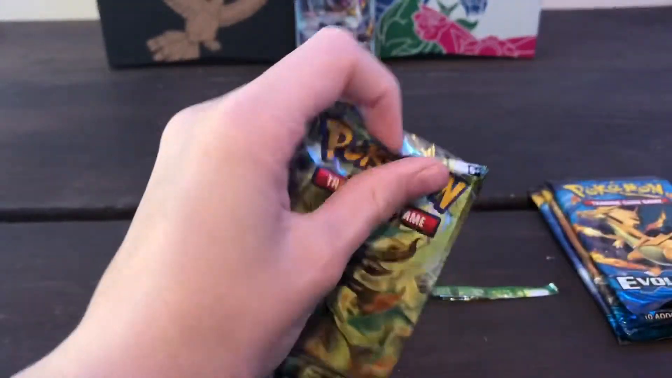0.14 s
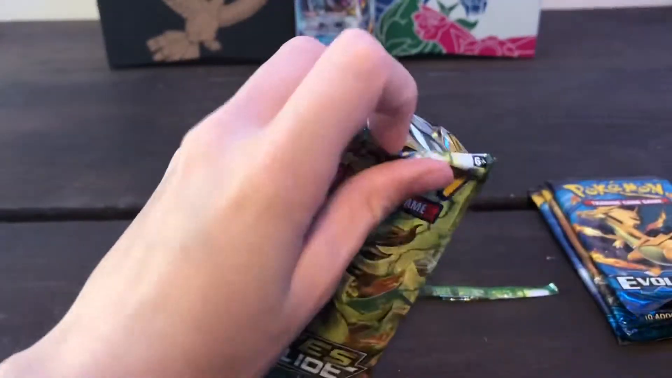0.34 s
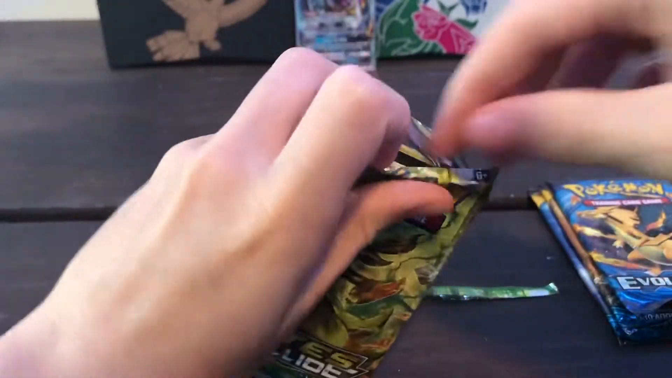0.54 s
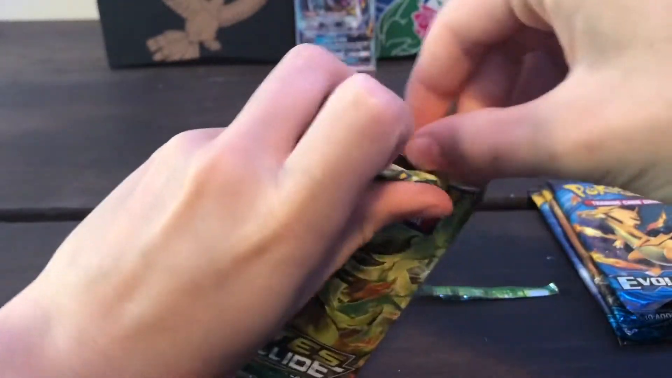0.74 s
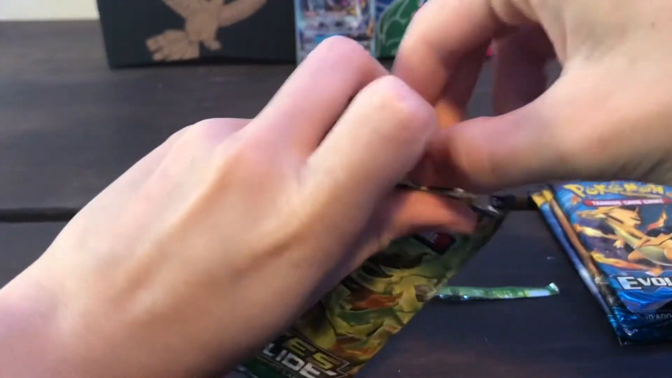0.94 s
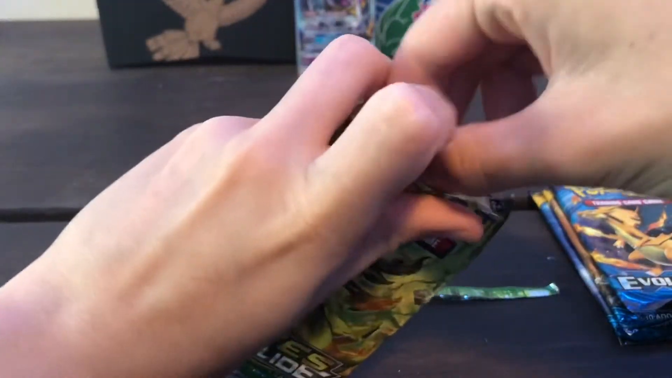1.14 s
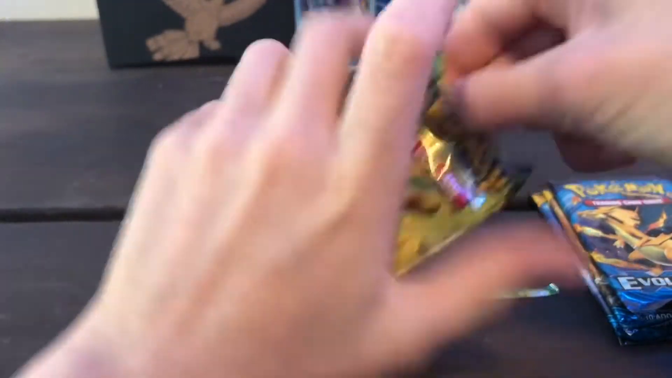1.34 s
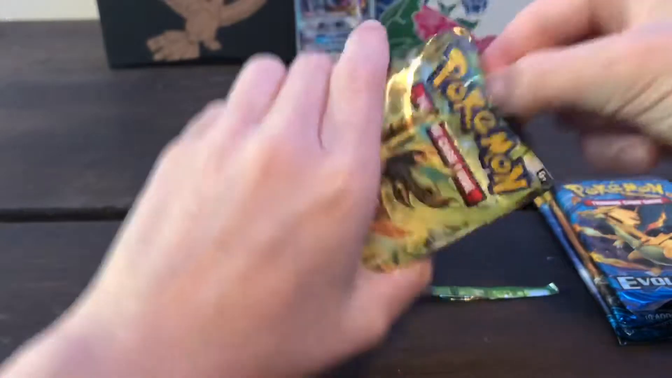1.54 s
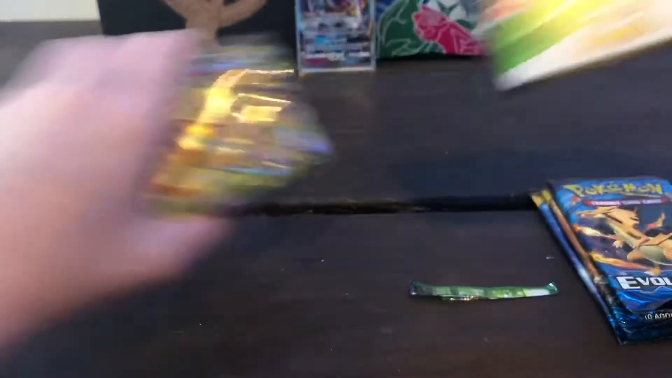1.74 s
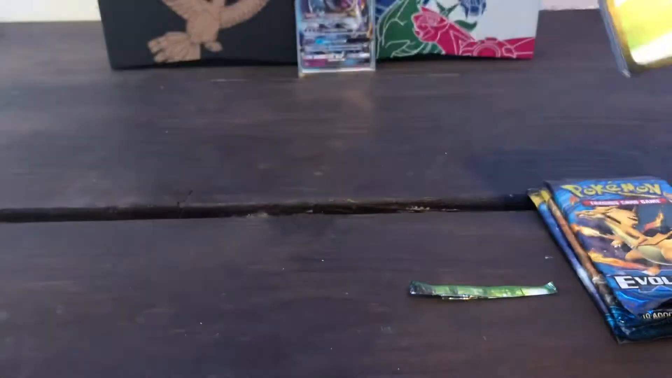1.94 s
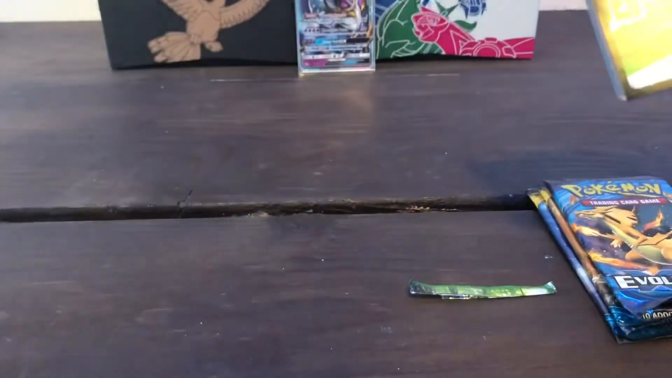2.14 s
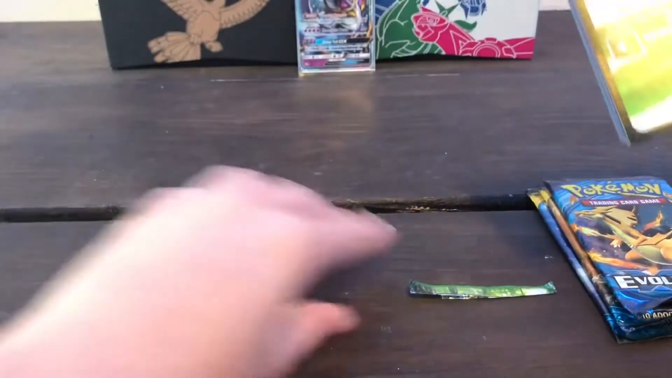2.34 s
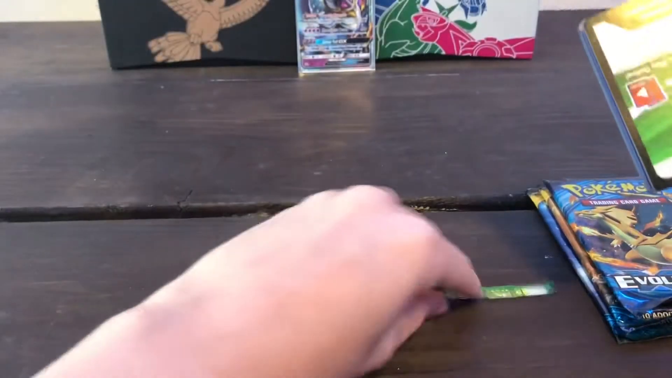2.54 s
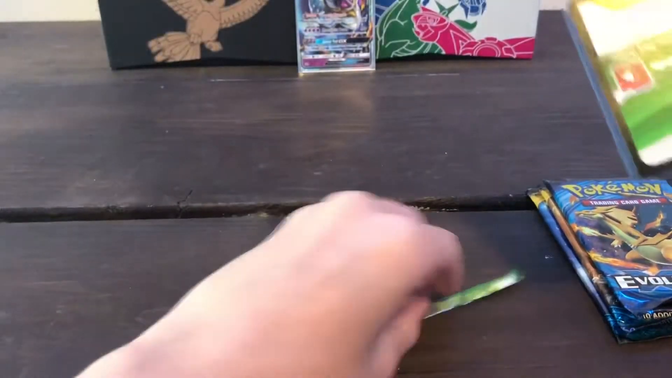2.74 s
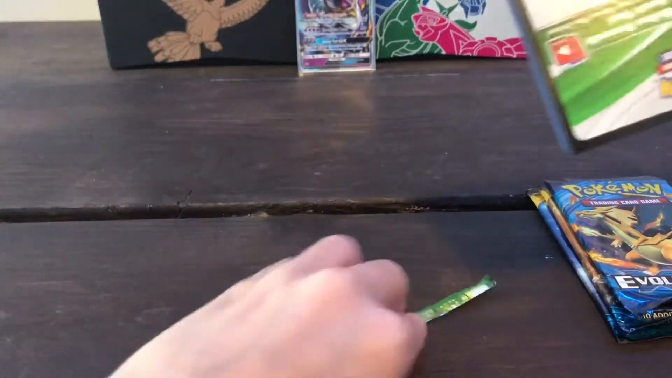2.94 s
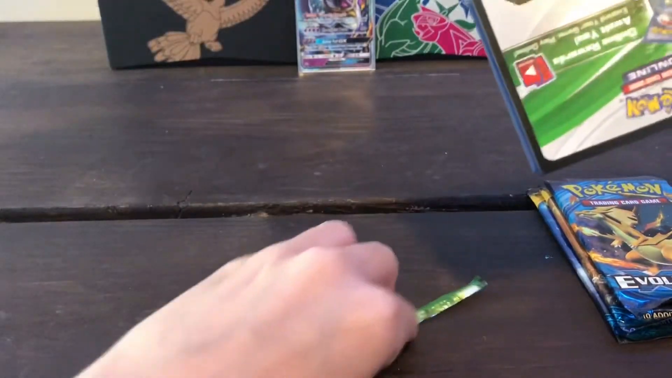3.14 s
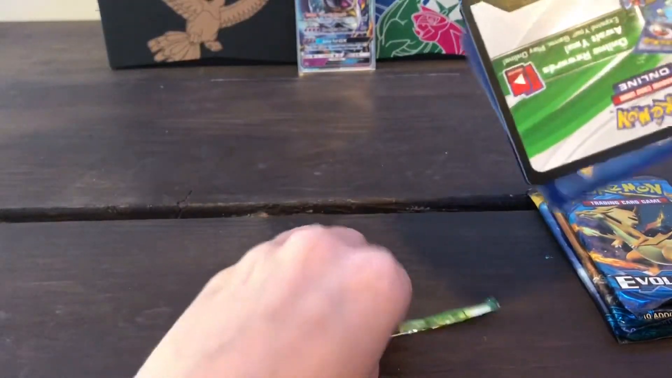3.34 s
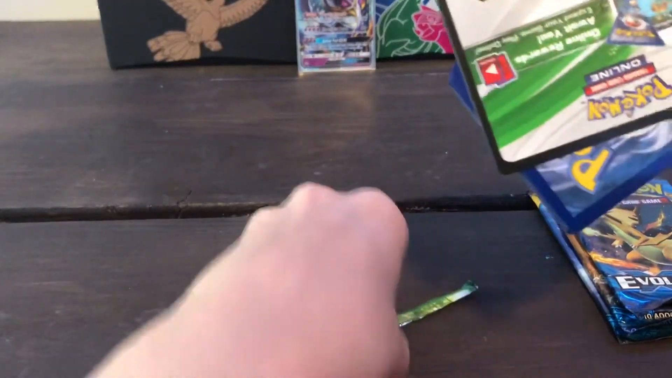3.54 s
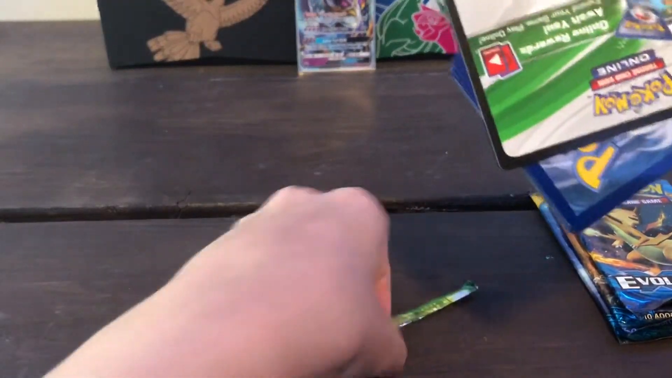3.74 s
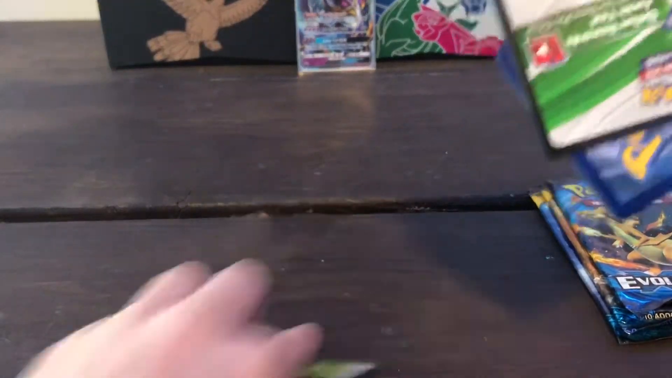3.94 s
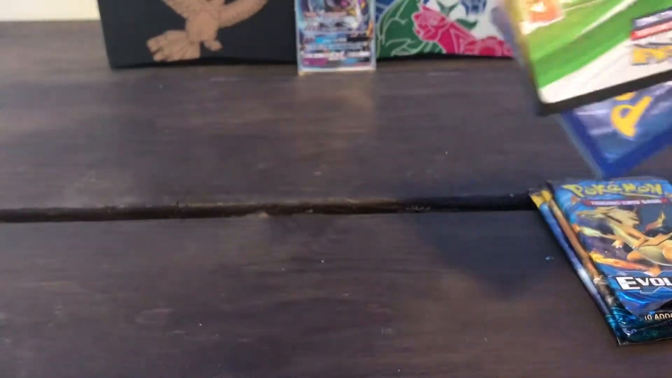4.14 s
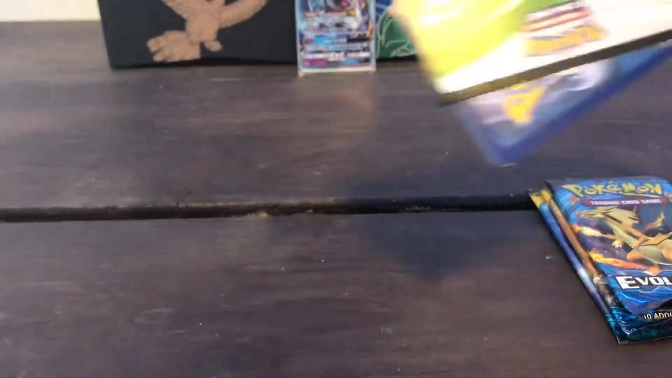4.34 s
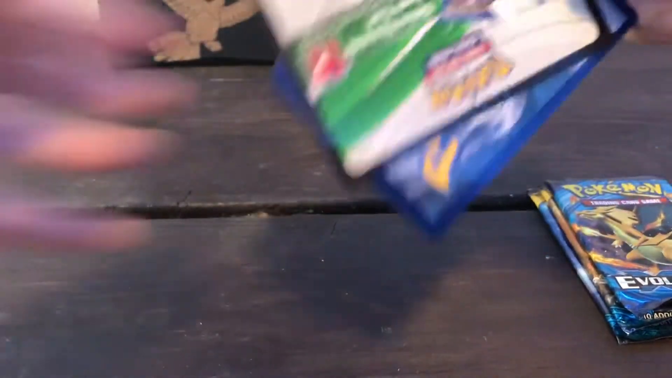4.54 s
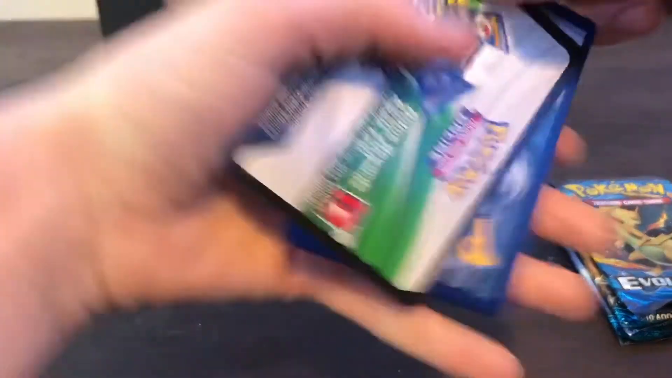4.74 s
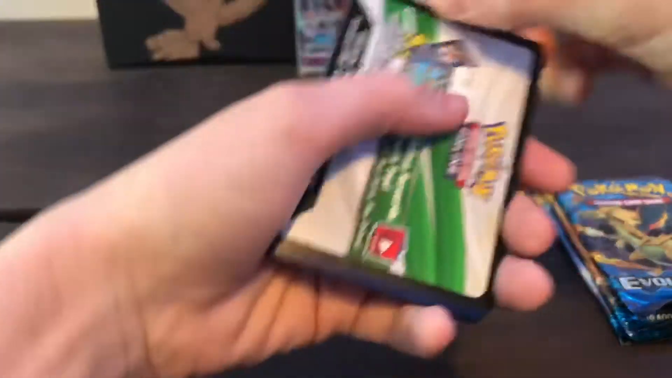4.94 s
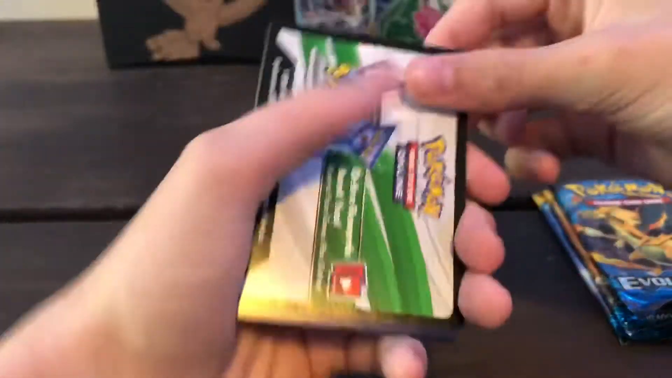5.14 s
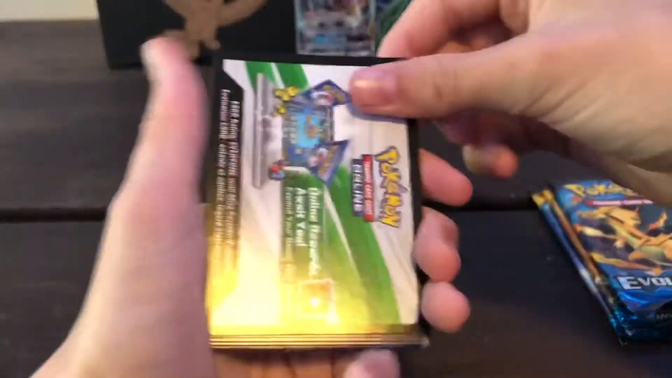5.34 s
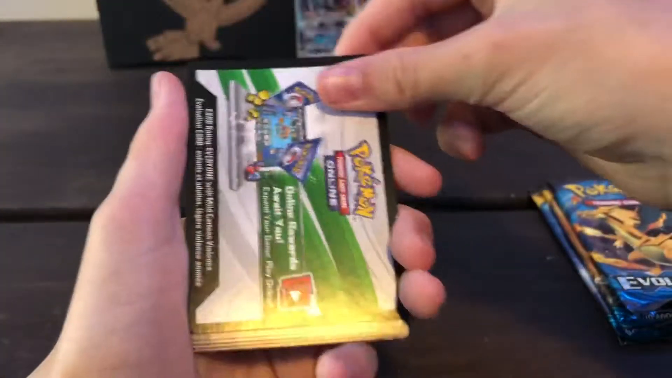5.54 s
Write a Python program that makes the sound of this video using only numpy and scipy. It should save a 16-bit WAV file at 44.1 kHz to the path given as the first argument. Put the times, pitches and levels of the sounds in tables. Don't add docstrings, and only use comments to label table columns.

```python
import sys
import numpy as np
from scipy import signal
from scipy.fft import rfft, irfft
from scipy.io import wavfile
from scipy.ndimage import uniform_filter1d

SR = 44100
rng = np.random.default_rng(int(sys.argv[2]) if len(sys.argv) > 2 else 0)


def level_to_linear(level):
    exponent = np.asarray(level, float) / 20
    return 10 ** exponent


def digitize_waveform(pressure):
    field = np.atleast_2d(pressure).T
    bounded = np.clip(field, -1, 1)
    quanta = np.round(bounded * 32767).astype(np.int16)
    wavfile.write(sys.argv[1], SR, quanta)


N = 246078


def evened(x):
    return x / np.sqrt(np.mean(x ** 2) + 1e-20)


def read(points, hz):
    point_hz, value = np.transpose(points)
    return np.interp(np.log(hz + 1), np.log(point_hz + 1), value)


def add(mix, s, sound):
    part = mix[max(round(s * SR), 0):][:len(sound)]
    part += sound[:len(part)]


def filtered(x, order, hz, kind):
    return signal.sosfilt(signal.butter(order, hz, kind, fs=SR, output="sos"), x)


def tipped_db(hz, dull_db, sharp_db):
    dull = 1 / (1 + (hz / 2900) ** 6)
    sharp = 1 / (1 + (9000 / (hz + 1)) ** 6)
    return np.outer(dull, dull_db) + np.outer(sharp, sharp_db)


def strokes(rows, rest_db):
    span_db, roundness = 20, 1.315
    t = np.arange(0, N / SR, .002)
    s, db, rise_s, fall_s, colour_db = np.transpose(rows)[:, :, None]
    away = np.maximum((s - t) / rise_s, (t - s) / fall_s)
    power = level_to_linear(2 * np.maximum(db - span_db * away ** roundness, -200))
    total = power.sum(0) + level_to_linear(2 * rest_db)
    return t, 10 * np.log10(total), (power * colour_db).sum(0) / total


def grit(per_s, spread_db, t60, smooth):
    size = level_to_linear(spread_db * np.minimum(rng.exponential(1, N), 1.8))
    slips = size * (rng.random(N) < per_s / SR)
    grip = signal.lfilter([1], [1, -level_to_linear(-60 / (t60 * SR))], slips)
    return evened((evened(grip) + smooth) * rng.standard_normal(N))


# (frequency [Hz], density [dB per Hz])
HUSH_SPECTRUM = [(18, -50), (30, -7.5), (48, 0), (399, -10.5), (1300, -19), (2600, -24.5), (15200, -32),
                 (16500, -39.5)]


def hush():
    level_db = -55
    hz, t, z = signal.stft(rng.standard_normal(N), SR, nperseg=1024)
    swell = evened(uniform_filter1d(uniform_filter1d(rng.standard_normal(z.shape), 6, 0), 7, 1))
    swell_db = 3 * swell / (1 + hz[:, None] / 900)
    z = z * level_to_linear(read(HUSH_SPECTRUM, hz)[:, None] + swell_db)
    return level_to_linear(level_db) * evened(signal.istft(z, SR, nperseg=1024)[1][:N])


# (frequency [Hz], T60 [s])
ROOM_DECAY = [(200, 0.2), (3000, 0.14), (15000, 0.032)]


def room(x):
    taps = np.zeros(SR // 2)
    at = np.arange(260, len(taps) - 20, 20)
    taps[at + rng.integers(0, 20, len(at))] = rng.choice([-1., 1.], len(at))
    hz, t, z = signal.stft(taps, SR, nperseg=256)
    z = z * level_to_linear(-60 * t / read(ROOM_DECAY, hz)[:, None])
    tail = signal.istft(z, SR, nperseg=256)[1]
    return signal.fftconvolve(x, tail / np.linalg.norm(tail))[:N]


# (time [s], peak [dB], frequency [Hz])
STAND_BUMPS = [(0.15, -42, 65), (0.501, -50, 95), (1.121, -48, 60.5), (1.39, -56, 60.5), (1.642, -41, 66),
               (1.749, -38, 64.6), (2.5, -42.5, 80), (2.821, -55, 55.4), (3.419, -61, 75.4),
               (3.529, -52, 64.8), (4.042, -47.5, 94.5), (4.103, -42.5, 98), (4.138, -45.5, 117),
               (4.2, -51.5, 106), (4.719, -47.5, 73), (4.95, -64, 90), (5.212, -54.5, 64),
               (5.541, -62.5, 70)]


def bumps():
    out, t = np.zeros(N), np.arange(SR // 5) / SR
    for s, db, hz in STAND_BUMPS:
        swing = np.minimum(t / 0.0039, 1) * np.sin(2 * np.pi * hz * t)
        add(out, s, level_to_linear(db + 11.5 - 60 * t * hz / 14.0) * swing)
    return out


def ring(force, modes):
    t = np.arange(SR // 2) / SR
    body = np.zeros(len(t))
    for k, (hz, db, t60) in enumerate(modes):
        body += (-1) ** k * level_to_linear(db - 60 * t / t60) * np.sin(2 * np.pi * hz * t)
    return signal.oaconvolve(force, body / np.linalg.norm(body))[:N]


# (peak time [s], level [dB], rise [s], fall [s], hardness on the upper modes [dB])
DRAGS = [(.05, -29, 0.23, 0.049, 5), (.14, -23.5, 0.013, 0.13, 7.5), (.2, -28, 0.089, 0.17, 9),
         (.27, -35, .11, 0.08, -10), (.52, -45, 0.18, 0.95, -18), (.8, -48, 0.047, 0.89, 20),
         (1.16, -47, 0.11, 0.13, 23), (1.5, -37.5, 0.059, 0.5, -11), (1.63, -40, 0.094, 0.32, -1),
         (1.85, -42.5, 1, 0.097, 2), (2.079, -40, 0.065, 0.13, 9.5), (2.33, -43.5, 0.037, 0.52, 3),
         (2.52, -40.5, 0.098, 0.059, 0), (2.8, -44.5, 0.16, 0.16, 6.5), (3.06, -35.5, 0.062, 0.082, -2),
         (3.25, -38, 0.058, 0.035, -3), (3.44, -44, 0.046, 0.35, 2.5), (3.57, -57, 0.19, 0.21, 4),
         (3.81, -42.5, 0.12, 0.15, 6), (3.92, -49, 0.31, 0.19, -13), (4.099, -46.5, 0.11, 0.089, 2),
         (5.0, -59, 0.76, 0.3, -6), (5.57, -54, 0.12, .11, 7)]
# (time [s], peak [dB], hardness on the upper modes [dB], ring of the struck spot [Hz])
BOARD_KNOCKS = [(0.004, -36, 7, 1160), (0.127, -20, 1.5, 1344), (0.194, -25, 4, 750),
                (1.613, -13.5, -14, 1185), (2.005, -29.5, 6.5, 1010), (2.047, -21.5, 1, 1130),
                (2.067, -28, 3, 1135), (2.304, -23, -12, 975), (2.895, -27.5, -15, 1020),
                (3.021, -64, -2.5, 1010), (3.409, -31, -30, 506), (3.469, -27, -13, 984),
                (3.51, -29.5, -8.5, 978), (3.532, -19, -15, 1010), (4.036, -29.5, -25, 1710),
                (4.093, -23, -23, 2050), (4.705, -28, -15.5, 476), (4.866, -38, -19, 600),
                (5, -42, -33.5, 697), (5.256, -44, -27.5, 588)]
# (frequency [Hz], level [dB], T60 [s])
LOW_BOARD_MODES = [(97.9, -1.5, 0.33), (137.4, 5.5, 0.14), (240, 7, 0.11), (269.4, 6, 0.075),
                   (460, 8, 0.022), (537, -8.5, 0.27)]
UPPER_BOARD_MODES = [(620, 1.4, 0.07), (705, 1.8, 0.086), (790, 4.4, 0.097), (967, 11.4, 0.057),
                     (1100, 2.3, 0.049), (1276, 4.6, 0.056), (1501, 5.4, 0.031), (1754, 6.15, 0.023),
                     (2013, 3.6, 0.013)]


def table():
    s, level_db, hard_db = strokes(DRAGS, rest_db=-77.0)
    t = np.arange(N) / SR
    low = level_to_linear(np.interp(t, s, level_db) + 1.5) * grit(per_s=28, spread_db=3.0, t60=0.09, smooth=1.1)
    low = 1.08 * filtered(low, 1, 260, "high")
    upper = level_to_linear(np.interp(t, s, level_db + hard_db) - 8.0)
    upper *= grit(per_s=85, spread_db=6.5, t60=0.014, smooth=2.7)

    spots, spot_db, spot_t60 = np.zeros(N), -1, .08
    blows = rng.standard_normal((len(BOARD_KNOCKS), 2, 900)) * level_to_linear(-60 * np.arange(900) / SR / 0.035)
    blows[:, :, 0] = 9
    t = t[:6000]
    for (s, db, hard_db, hz), (a, b) in zip(BOARD_KNOCKS, blows):
        add(low, s, level_to_linear(db + 17.5) * a / np.linalg.norm(a))
        add(upper, s, level_to_linear(db + hard_db + 24.5) * b / np.linalg.norm(b))
        add(spots, s, level_to_linear(db + hard_db + spot_db - 60 * t / spot_t60) * np.sin(2 * np.pi * hz * t))

    soft = filtered(low, 2, [95, 900], "band")
    dead = filtered(soft, 2, [170, 450], "band")
    upper = uniform_filter1d(upper, 5)
    return ring(soft, LOW_BOARD_MODES) + 3.4 * dead + ring(upper, UPPER_BOARD_MODES) + spots


LANDING_TIMES = [
    0.0034,
    .127,
    .203,
]
# (frequency [Hz], T60 [s], level at first, second, third spot [dB])
LONG_BOARD_MODES = [(101.7, 0.46, -25.5, -36, -26.5), (135.6, 0.48, -20.5, -27.5, -20.5),
                    (225, .12, -29, -13.5, -27), (280, 0.15, -33.5, -23, -27),
                    (430, 0.14, -41, -23.5, -15.5), (465, 0.15, -40, -31, -42.5),
                    (567, 0.48, -33, -25.5, -31), (600, 0.24, -26.5, -31, -31),
                    (732, 0.077, -40.5, -14, -32), (783, 0.13, -62.5, -25.5, -26),
                    (1010, 0.2, -25.5, -34, -33.5), (1080, 0.14, -16.5, -54.5, -31),
                    (1450, 0.066, -28.5, -22, -29), (1710, 0.079, -32, -20, -28.5)]


def landings():
    out, t = np.zeros(N), np.arange(SR // 2) / SR
    onset = 1 - np.exp(-t / 0.0025)
    for k, s in enumerate(LANDING_TIMES):
        for j, (hz, t60, *spot_db) in enumerate(LONG_BOARD_MODES):
            tone = onset * np.sin(2 * np.pi * hz * t)
            add(out, s, (-1) ** j * level_to_linear(spot_db[k] - 60 * t / t60) * tone)
    return out


def gripped(rows, dull_db, dull_per_db, rest_db):
    t, level_db, sharp_db = strokes(rows, rest_db)
    dull = dull_db + dull_per_db * (np.maximum(level_db, -70) + 45)
    return np.transpose([t, level_db, dull, sharp_db])


def hiss(rows, surface, change_s, force, trim_db, patchy_db):
    hz, t, z = signal.stft(force, SR, nperseg=256, noverlap=192)
    s, level_db, dull_db, sharp_db = np.transpose(rows)
    patches = evened(uniform_filter1d(uniform_filter1d(rng.standard_normal(z.shape), 9, 0), 9, 1))
    field_db = tipped_db(hz, np.interp(t, s, dull_db), np.interp(t, s, sharp_db)) + patchy_db * patches
    f, *faces_db = np.transpose(surface)
    before_db, after_db = [np.interp(np.log(hz + 1), np.log(f), db)[:, None] for db in faces_db]
    field_db += np.where(t < change_s, before_db, after_db)
    out = signal.istft(z * level_to_linear(field_db), SR, nperseg=256, noverlap=192)[1][:N]
    return out * level_to_linear(np.interp(np.arange(N) / SR, s, level_db, -120, -120) + trim_db)


# (peak time [s], level [dB], rise [s], fall [s], sharp part [dB])
CARD_STROKES = [(2.31, -48, .012, 0.17, -14), (2.45, -62, 0.62, 0.25, -5), (2.52, -41.5, 0.04, 0.041, -1),
                (2.6, -60.5, 0.15, 0.37, 8), (2.685, -35, 0.035, 0.03, 4.5), (2.765, -38, 0.037, 0.088, 7),
                (2.85, -47, 0.21, 0.16, 10), (3.06, -46.5, 0.057, 0.034, -17),
                (3.095, -40.5, 0.036, 0.039, -4), (3.13, -56.5, .012, 0.076, 7),
                (3.212, -43.5, 0.019, 0.066, 11), (3.248, -45.5, .03, 0.021, -4),
                (3.36, -53.5, 0.17, 0.13, 4), (3.474, -46, 0.01, 0.021, 3),
                (3.53, -46.5, 0.035, 0.056, -10.5), (3.724, -51.5, 0.0076, .1, 6.5),
                (3.76, -42, 0.029, 0.037, 6.5), (3.79, -37, 0.031, 0.028, 9), (3.83, -40, 0.0753, 0.1, 8.5),
                (3.925, -31, 0.038, 0.11, 9), (3.968, -23, 0.089, 0.096, 14), (4.035, -29, .07, 0.11, 16.5),
                (4.105, -34, 0.055, 0.063, -2.5), (4.16, -52, .05, 0.14, -6.5),
                (4.638, -50.5, 0.0047, 0.066, -9.5), (4.66, -40.5, 0.015, 0.03, -12),
                (4.697, -56, .005, 0.033, -9.5), (4.707, -34, 0.0062, 0.055, -21),
                (4.74, -30.5, 0.037, 0.04, -0.5), (4.766, -40, 0.027, 0.01, 2),
                (5.03, -61.5, 0.1, 0.021, -8), (5.32, -62, 0.021, 0.022, -1.5),
                (5.546, -47.5, 0.016, 0.19, -3)]
# (frequency [Hz], fanning the cards [dB], squaring the stack [dB])
CARD_COLOUR = [(498, -18.5, -27), (1100, 1, -7.5), (1750, 1.5, -8), (2700, 0, -0.5), (3700, 0.5, 0),
               (5400, 2.5, -0.5), (11340, -6, 1.5), (14920, -2.5, 6)]
STACK_BANDS_HZ = [2650, 5500]


def card_slides():
    squared_s, ring_db = 4.5, 4
    grip = gripped(CARD_STROKES, dull_db=1.1, dull_per_db=-0.23, rest_db=-78.5)
    force = grit(per_s=320, spread_db=9.5, t60=0.0044, smooth=3.0)
    cards = hiss(grip, CARD_COLOUR, squared_s, force, trim_db=3.5, patchy_db=1.5)
    rings = sum(signal.lfilter(*signal.iirpeak(hz, 7, fs=SR), cards) for hz in STACK_BANDS_HZ)
    return cards + level_to_linear(ring_db) * rings * (np.arange(N) > squared_s * SR)


# (peak time [s], level [dB], rise [s], fall [s], sharp part [dB])
FOIL_SQUEEZES = [(0, -24.5, .05, 0.057, -13), (.13, -27.5, 0.14, 0.14, -2), (.21, -38, 0.1, 0.042, 18),
                 (.365, -66, .011, .08, -11.5), (.456, -46, 0.009, 0.19, 14), (.655, -42, 0.31, 0.38, -6),
                 (.8, -37, 0.25, 0.25, -11.5), (.91, -42, .11, 0.37, -9), (1.048, -32, 0.022, 0.3, -3.5),
                 (1.152, -24, .022, 0.04, -9), (1.176, -22.5, .06, 0.038, -6.5),
                 (1.235, -36, .07, 0.063, 7.5), (1.35, -35, 0.045, 0.16, -6),
                 (1.52, -25.5, .11, 0.025, -1.5), (1.6, -25.5, .15, 0.092, 4),
                 (1.645, -29, 0.17, 0.0079, 0.5), (1.74, -41.5, .25, 0.23, -7),
                 (1.93, -39, 0.11, 0.11, -14), (2.025, -35.5, 0.027, 0.12, -13)]
# (frequency [Hz], sliding on the wood [dB], crinkling [dB])
FOIL_COLOUR = [(251, -9.5, -6.5), (780, 0, -2), (2780, -2, -0.5), (3930, -10, -4.5), (4100, 3.5, -1.5),
               (14990, -6.5, -4)]
GRAIN_EDGES_HZ = [200, 1800, 4200, 8500, 19000]


def foil_rustle():
    slide_ends_s = .155
    grains = grit(per_s=600, spread_db=5, t60=.006, smooth=.6)
    sizes = np.zeros(N)
    for k, band in enumerate(zip(GRAIN_EDGES_HZ, GRAIN_EDGES_HZ[1:])):
        sizes += filtered(np.roll(grains, k * N // 5), 1, band, "band")
    grip = gripped(FOIL_SQUEEZES, dull_db=0.5, dull_per_db=-0.059, rest_db=-87.5)
    return hiss(grip, FOIL_COLOUR, slide_ends_s, evened(sizes), trim_db=7.0, patchy_db=2.0)


# (time [s], peak [dB], frequency [Hz], T60 [s])
PANEL_POPS = [(0.444, -21, 3050, 0.016), (0.5187, -18, 1270, 0.013), (0.543, -13.5, 1480, 0.012),
              (0.7391, -17, 1100, 0.009), (0.7678, -15.5, 917, 0.011), (0.8827, -25.5, 1710, 0.028),
              (1.0106, -0.5, 2590, 0.0081), (1.0108, -24.5, 2300, .008), (1.059, -2.5, 1950, 0.0074),
              (1.061, -14.5, 1170, 0.016), (1.2213, -13, 2537, 0.013), (1.3321, 0.5, 5510, 0.011),
              (1.4378, -22.5, 2213, 0.0072), (1.7017, -11.5, 4400, 0.01), (1.727, -36, 1436, 0.046),
              (1.879, -24, 775, 0.021), (1.9138, -6, 2773, 0.0065), (2.749, -39.5, 1370, 0.038),
              (3.135, -44, 517, .05), (4.707, -34, 338, .04), (.4245, -32.5, 710, .012),
              (1.004, -21, 703, 0.012), (3.47, -27, 1650, .02), (3.478, -34, 1910, .02),
              (4.034, -28, 1643, .04), (3.96, -29.5, 1900, .05), (1.157, -17.5, 797, .04),
              (0.446, -27, 330, 0.021), (.36, -20.5, 800, 0.013), (3.472, -37, 984, 0.05),
              (3.474, -39, 514, 0.074)]


def pops():
    rise_s = 0.0037
    out, t = np.zeros(N), np.arange(SR // 10) / SR
    for s, db, hz, t60 in PANEL_POPS:
        note = (1 - np.exp(-t / rise_s)) * np.sin(2 * np.pi * hz * t)
        add(out, s, level_to_linear(db + 10.0 - 60 * t / t60) * note)
    return out


def snap(db, hz, dull_db, sharp_db, noise, chance):
    bass_lag_s, thin_hz = 0.0018, 900
    t, f = np.arange(len(noise)) / SR, np.fft.rfftfreq(len(noise), 1 / SR)
    t60 = 0.0052 * level_to_linear(0.17 * db + 3.5)
    crack = noise * level_to_linear(-60 * t / t60) * np.minimum(t / 0.000067, 1)

    colour = level_to_linear(tipped_db(f, dull_db + .5, sharp_db + .5)[:, 0])
    colour *= (f + 30) ** 2 / (f ** 2 + thin_hz ** 2)
    colour *= 1 + 6 / (1 + ((f - hz) / (110 + .04 * hz)) ** 2) / (1 + hz / 2500)
    for u in chance:
        colour *= 1 + 1.2 / (1 + ((f - 16000 * u) / 400) ** 2)
    log_gain = np.log(np.concatenate([colour, colour[-2:0:-1]]))
    causal = np.exp(np.conj(signal.hilbert(log_gain)))[:len(f)]

    spectrum = rfft(crack)
    spectrum /= np.sqrt(uniform_filter1d(abs(spectrum) ** 2, 30))
    lag = np.exp(-2j * np.pi * bass_lag_s * 1000 * np.log(1 + f / 300))
    crack = irfft(spectrum * causal * lag)
    crack += 0.13 * np.roll(crack, round(0.0037 * SR))
    return level_to_linear(db + 3.0) * crack[:len(crack) // 2] / abs(crack).max()


# (time [s], peak [dB], ringing patch [Hz], dull part [dB])
PRY_CREASES = [(.0047, -6.5, 5920, 4.5), (.1568, -10.5, 2120, -11), (.1742, 3.5, 10100, -2),
               (.2047, -15, 1900, -3), (.2993, -29.5, 5490, 6), (.2559, -31.5, 2840, 8),
               (.3595, -15, 2600, -1), (.445, -1, 8300, -9), (.4478, -22, 7350, 13),
               (.5173, -3.5, 7300, 1.5), (.5446, -18, 2380, -7), (.5547, -13.5, 12100, 12),
               (.6249, -10, 3060, -5), (.6428, -3.5, 9600, -7), (.6786, -12.5, 2640, 1),
               (.7157, -17, 4860, -8), (.7386, -16, 2650, 1.5), (.755, -18.5, 5200, -18),
               (.7682, -18, 2780, 13), (.778, -12, 4230, -1), (.8815, -17.5, 2620, -4),
               (.8865, -13, 5670, 10), (.8951, -9.5, 4750, 4), (.9354, -16, 6700, 10),
               (.9475, -27, 1700, 20), (1.0005, -23, 1560, 0), (1.0061, -12.5, 4420, 11),
               (1.0106, -25.5, 2640, -4), (1.0392, -17, 4900, -9), (1.0437, -17.5, 2600, -1)]
PULL_CREASES = [(1.0547, -3.5, 5500, -6.5), (1.0584, -4.5, 3240, -2), (1.1123, -9.5, 6740, -9),
                (1.1296, -1, 6000, 2), (1.1951, -7, 4700, 3.5), (1.2225, 5, 13900, -0.5),
                (1.3144, 2.5, 2540, -5), (1.333, -1, 3200, -2), (1.339, -2.5, 2530, -6.5),
                (1.393, -20.5, 9500, -3.5), (1.4378, -16, 2450, 16.5), (1.4788, 1, 5860, -3),
                (1.495, -4, 8700, -5), (1.497, -0.5, 6500, -9.5), (1.5058, -2, 6000, -6.5),
                (1.569, -18.5, 7000, 9.5), (1.631, -10.5, 2350, 2.5), (1.637, -0.5, 8000, -4.5),
                (1.6483, -7, 8100, -4), (1.6745, -13, 3930, -12), (1.702, -13.5, 4220, 4),
                (1.711, -12.5, 5100, 1.5), (1.7748, -15.5, 5060, -0.5), (1.824, -21.5, 3810, 15),
                (1.863, -20.5, 3780, 11), (1.877, -16, 5270, 5), (1.9141, -8, 3120, 3),
                (2.0053, -9.5, 5400, 0.5), (2.0116, -16, 5030, -3.5), (2.045, -16, 7930, -4)]
EDGE_CLICKS = [(2.498, -24.5, 14900, -4), (2.511, -25, 13700, -8), (2.5175, -17, 13780, -13),
               (2.53, -19, 15200, -12), (2.5849, -26.5, 5200, 1), (2.756, -21, 12000, -5),
               (2.76, -19.5, 11670, -20), (2.7736, -16, 8400, -5), (2.778, -8.5, 14880, -7),
               (2.791, -15.5, 9250, -13), (2.7974, -9.5, 14800, -14), (2.8018, -12, 14940, -1),
               (2.8234, -6, 13800, 6), (2.8322, -9, 16800, -19), (3.1286, -26, 6550, -11),
               (3.1322, -23.5, 6600, -26), (3.332, -20.5, 7060, -6), (3.405, -33, 14800, 12),
               (3.474, -38, 2900, 26), (4.098, -8.5, 4850, -9), (4.11, -16.5, 4720, -14.5),
               (4.8489, -35, 8730, 1.5), (5.038, -39, 4800, -6.5)]
SMALL_CREASES = [(.368, -28, 5500, -14), (.511, -26.5, 5000, -9), (.539, -20, 7200, 3),
                 (.5731, -25, 12490, -8), (.6053, -29, 3100, 5), (.612, -26, 2840, 3),
                 (.7422, -17.5, 4050, -5), (1.029, -22.5, 3050, 6), (1.1256, -20, 2000, 0),
                 (1.1493, -14.5, 3120, -10), (1.1543, -10, 5050, 9), (1.158, -9.5, 7140, 6),
                 (1.1795, -16, 5967, -1), (1.2035, -15, 7000, 2), (1.308, -22.5, 5680, -18),
                 (1.4768, -14, 3330, -7), (1.5035, -2.5, 5660, -14.5), (1.519, -11, 8900, -9),
                 (1.5235, -12.5, 2570, 7), (1.5307, -10.5, 3170, -24), (1.5474, -11, 6940, -25),
                 (1.5831, -12, 2100, -16), (1.598, -15, 1770, 5), (1.615, -22.5, 2020, -9),
                 (1.641, -7, 6130, 7), (1.7332, -26, 4310, 2), (1.797, -39, 2500, 5),
                 (1.8964, -34.5, 4000, 18.5), (2.5773, -35, 12830, 2.5), (2.8919, -30, 13000, -3.5),
                 (3.0887, -29, 4870, 0), (3.0934, -34, 4610, -4), (3.2095, -31, 4970, -10),
                 (3.248, -28, 14400, -2), (3.2722, -39, 13910, 4.5), (3.363, -36, 13800, 0),
                 (3.5172, -31, 2040, 11.5), (3.676, -43, 9000, 11.5), (5.0265, -43, 7160, -8.5)]
MORE_CREASES = [(.806, -30.5, 6000, -8), (.8215, -30, 2900, 12), (1.3235, -14, 2700, -13),
                (1.348, -16.5, 2600, -10), (1.452, -21.5, 2300, 3), (1.679, -22.5, 14000, -10),
                (2.764, -20.5, 13000, -3.5), (2.8255, -16, 14100, -13), (2.8303, -18.5, 13600, 1),
                (4.7355, -24, 5500, -6), (4.751, -33, 9000, -10), (.666, -24.5, 11000, -12)]


def foil_snaps(rows):
    out = np.zeros(N)
    draws, chance = rng.standard_normal((len(rows), 2048)), rng.random((len(rows), 4))
    for (s, db, hz, dull_db), noise, spots in zip(rows, draws, chance):
        sharp_db = -19 + 2.14 * hz / 1000 + 0.046 * db - 0.096 * dull_db
        add(out, s, snap(db, hz, dull_db, sharp_db, noise, spots))
    return out


def scene():
    room_db = -18.5
    near = table() + landings() + bumps()
    near += card_slides() + foil_rustle() + pops()
    near += foil_snaps(PRY_CREASES + PULL_CREASES + EDGE_CLICKS) + foil_snaps(SMALL_CREASES)
    bare = foil_snaps(MORE_CREASES)
    return (near + bare + level_to_linear(room_db) * room(near) + hush())[None]


def roll_off(x):
    return signal.sosfilt(signal.butter(12, 17040, fs=SR, output="sos"), x)


def record(dry):
    dry = filtered(dry, 2, 55, "high")
    dry = signal.sosfilt(signal.ellip(9, .3, 44, 15750, fs=SR, output="sos"), dry)
    mix = np.clip(dry, -1, 1)
    return roll_off(mix)


dry = scene()
out = record(dry)
digitize_waveform(out)
```